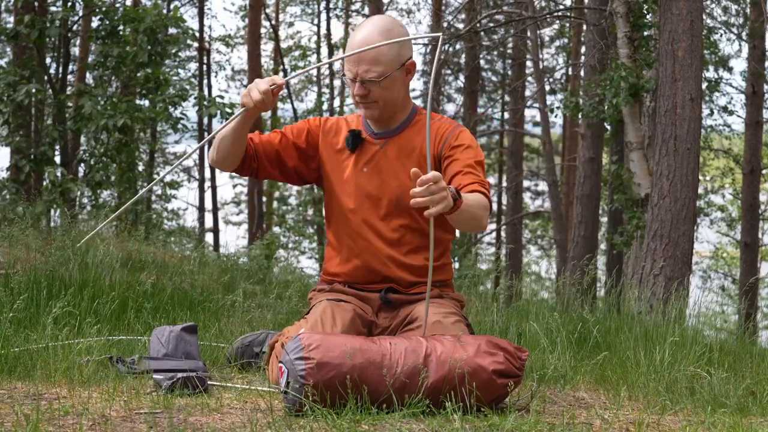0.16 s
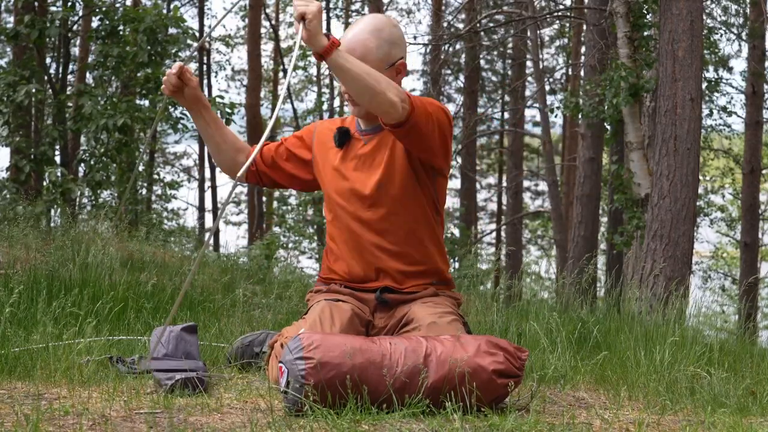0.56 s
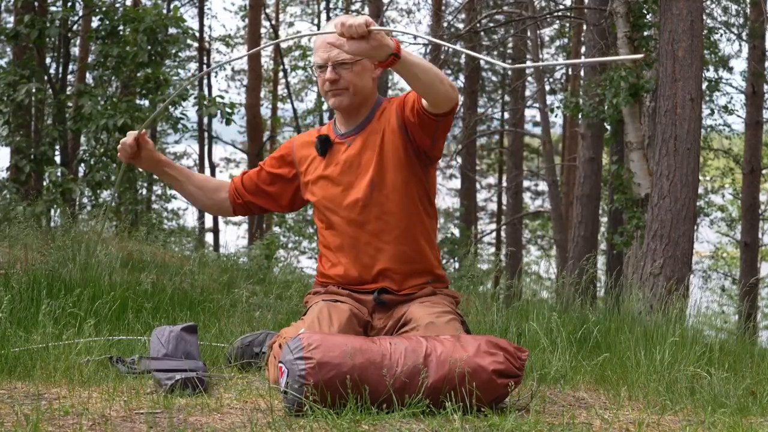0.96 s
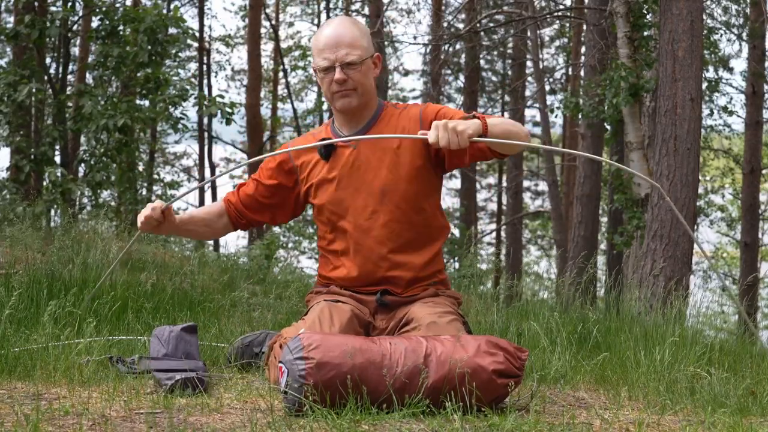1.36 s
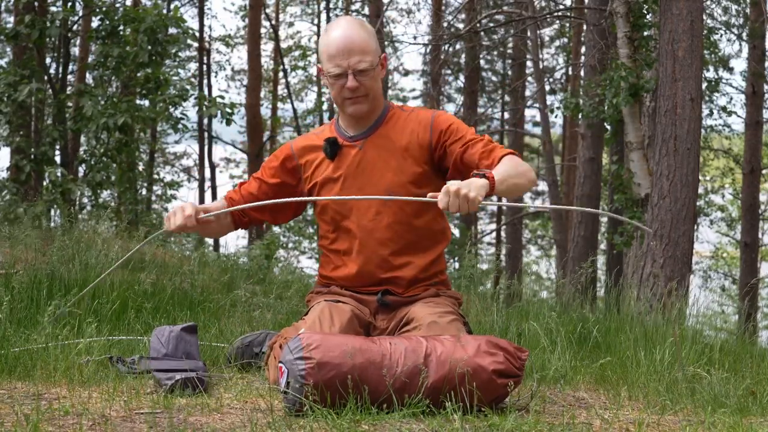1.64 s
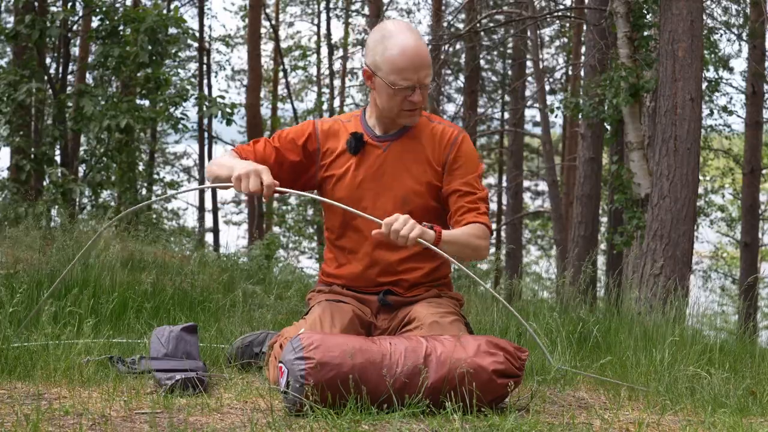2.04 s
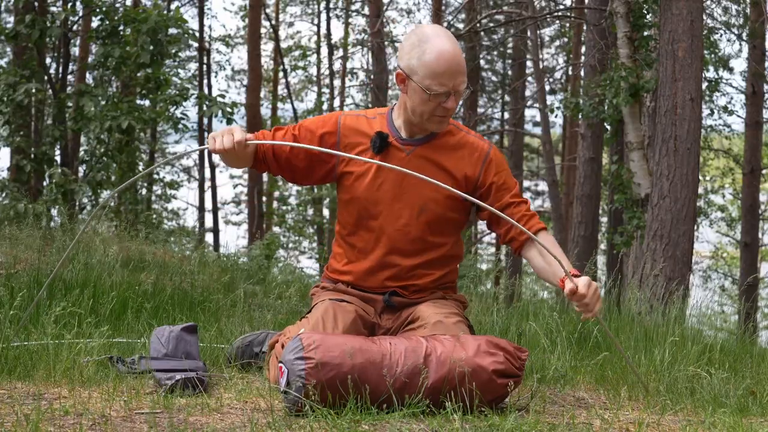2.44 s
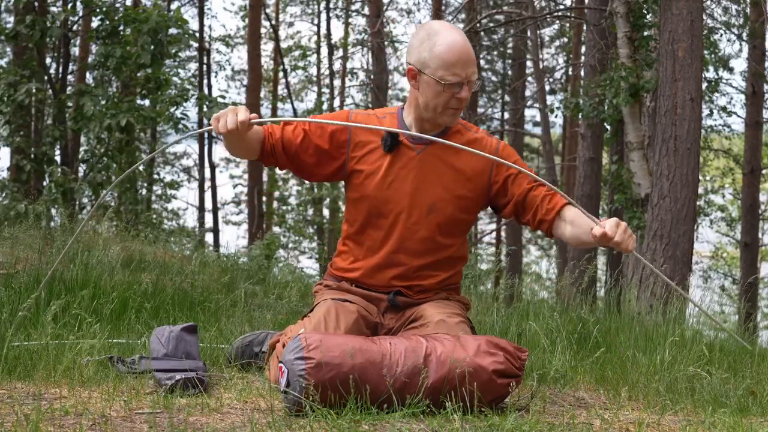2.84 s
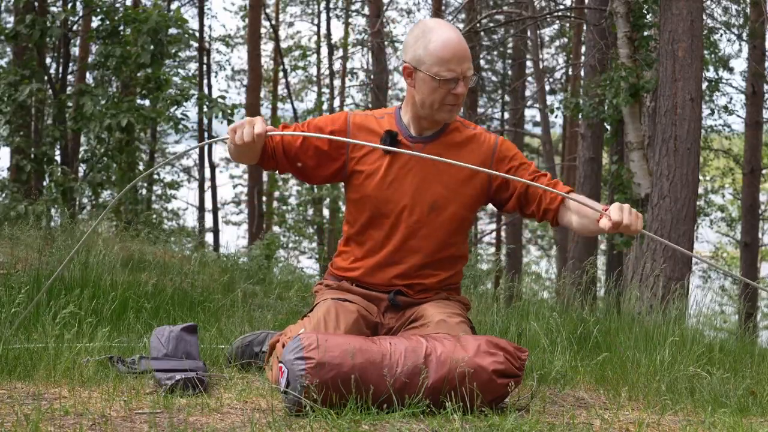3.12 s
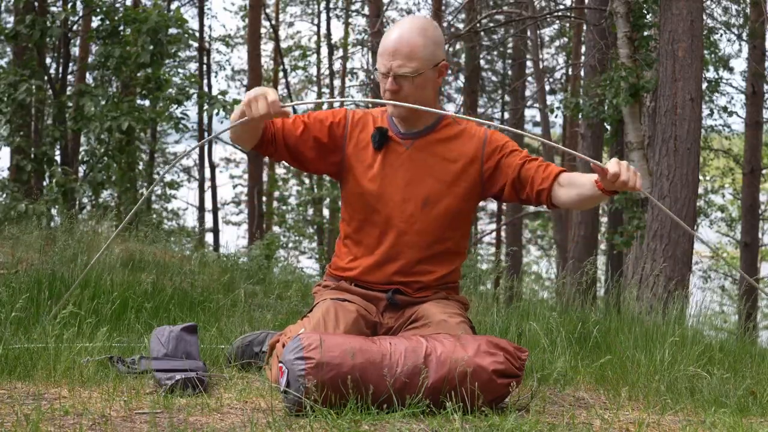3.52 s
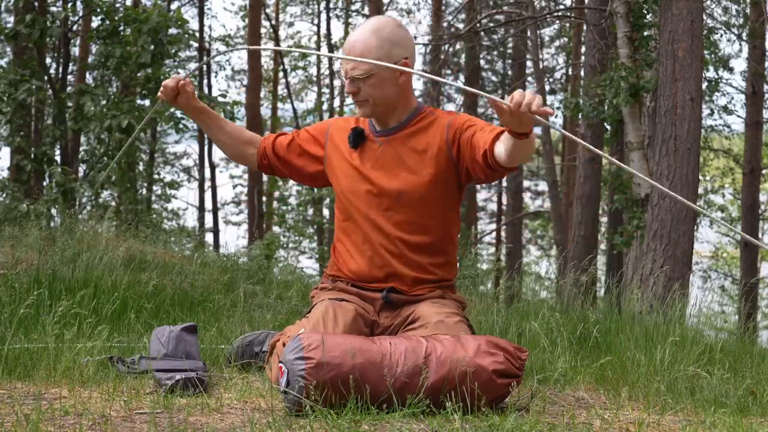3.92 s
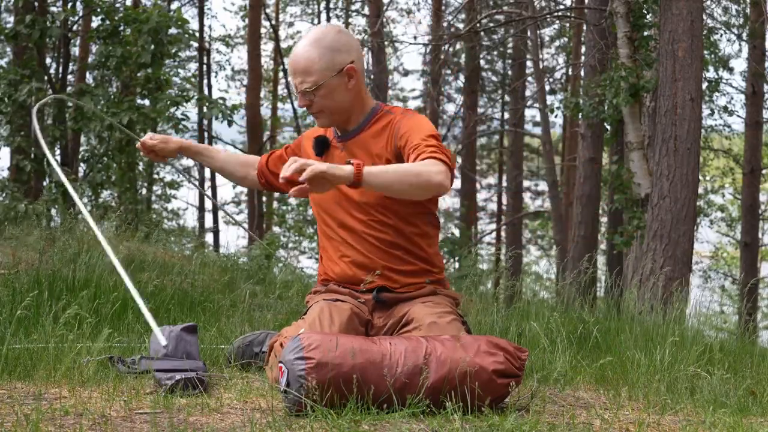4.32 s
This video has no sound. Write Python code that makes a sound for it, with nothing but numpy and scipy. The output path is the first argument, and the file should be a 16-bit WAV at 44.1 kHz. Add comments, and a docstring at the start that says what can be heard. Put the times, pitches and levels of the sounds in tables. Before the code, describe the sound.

Outdoors among pines, a tent pole is unfolded very close to a clip-on microphone. A quick rattle of thin tubes and cloth rustle comes first, then separate hard snaps with short scrapes. A finch trills and buzzes at a distance in the first half, with a light forest echo. Later come soft sliding, a strained creak, a strong double snap, and quiet rustling over a soft breeze.

```python
"""Cloth rustles close to a clip-on microphone over a soft breeze, then tubes scrape, rattle and snap:
a shock-corded tent pole is unfolded in a pine wood. Contacts are noise bursts rung through tube resonances;
hands, sleeves and breeze are coloured noise; squeaks and the cord's zip are tones of uneven pitch.
A finch, built from bending and buzzing whistles, sings one phrase farther off, with a scattered echo."""
import sys
import numpy as np
from scipy import signal
from scipy.fft import rfft, irfft, next_fast_len
from scipy.io import wavfile
from scipy.ndimage import uniform_filter1d, map_coordinates

SR = 44100
rng = np.random.default_rng(int(sys.argv[2]) if len(sys.argv) > 2 else 0)


def pcm_store(signal):
    """Save signal as 16-bit PCM."""
    levels = np.round(np.clip(np.atleast_2d(signal), -1, 1) * 32767)
    wavfile.write(sys.argv[1], SR, levels.astype(np.int16).T)


N = 197612

# contacts of the tubes: [t/s, t60/s, level/dB, low knock/dB, brightness/dB, ring f/Hz, knock f/Hz];
# knock and brightness are relative to the level
TUBE_CONTACTS = [(0.1051, 0.016, -13, 15, -21, 7000, 696), (0.1117, 0.035, -13.5, 3.5, -2, 6350, 750),
                 (0.122, 0.0085, -26, 17, -20, 4400, 1300), (.1375, 0.01, -28, 14, -25, 3300, 700),
                 (.1475, 0.021, -10, 3.5, -11, 5500, 600), (0.1611, 0.0089, -18, 2, -20, 3980, 1200),
                 (.17, 0.017, -17, 4, 3, 4570, 600), (.257, 0.035, -18.5, 1, -2, 6400, 1400),
                 (0.4098, 0.0062, -22, 8, -40, 4960, 1200), (.414, 0.015, -15.5, 12.5, -54, 4800, 420),
                 (.577, .018, -16, 4, -37, 3770, 1500), (0.7089, 0.0055, -1.5, -6.5, 1, 5500, 805),
                 (0.7106, 0.014, 5, -5.5, 2.5, 5600, 1280), (0.8285, 0.012, -25.5, 18.5, -19, 4020, 1260),
                 (0.8426, 0.013, -22.5, 3, -20, 5640, 1000), (.89, .013, -27, -1, -19, 6800, 1000),
                 (1.0893, 0.017, -1, -2, -28, 6700, 1200), (1.0918, 0.03, -3.5, -5.5, -12, 2950, 1200),
                 (1.2988, 0.007, -23, 0, -31, 3470, 1000), (1.4559, 0.015, 8, 0, -5, 4360, 500),
                 (1.487, 0.019, -13, -19, -12, 2980, 1000), (1.526, 0.0078, -18, -13, -19, 4200, 1000),
                 (1.8033, 0.017, -12.5, -1.5, -44, 3200, 1600), (1.8295, 0.021, -2, -11, -5.5, 4030, 1600),
                 (1.859, 0.028, -9, -23, -16, 3200, 1980), (1.97, 0.011, -12.5, -19, -31, 3580, 2110),
                 (2.049, 0.0077, -23.5, -10, -42, 2560, 2300), (2.511, .018, -22, 1, -21, 7010, 980),
                 (2.525, 0.015, -23.5, 4, -11, 5170, 1000), (2.843, 0.044, -20, -19, 1.5, 3400, 2000),
                 (2.8886, 0.011, -23, -3, -15, 3070, 2000), (2.9796, 0.017, -5, -27, -21.5, 6200, 2000),
                 (2.9814, 0.011, -8.5, -1, -5, 6600, 2300), (3.0455, 0.016, 7.5, 0.5, -0.5, 5440, 1040),
                 (3.0552, 0.014, -3.5, -7, -11, 2720, 2440), (3.1492, 0.038, -14.5, -4, -36, 5460, 2300),
                 (3.8254, 0.015, -14.5, -7, -2, 5400, 1600), (3.8371, .02, -7, 0.5, 0, 3780, 1640)]
# resonances of the tubes: [f/Hz, width/Hz, level/dB]
TUBE_MODES = [(620, 180, -11.5), (1150, 540, -6), (2260, 460, -7), (3020, 670, -4), (4620, 700, -4),
              (5480, 540, -6), (6230, 390, -7), (7000, 740, -12), (9200, 1400, -18), (11070, 550, -19),
              (13800, 700, -33)]


def amp(db):
    """Decibels to gain."""
    return 10 ** (np.asarray(db) / 20)


def unit(x):
    """Scaled to rms 1."""
    return x / np.sqrt(np.mean(x ** 2) + 1e-20)


def along(points, hz):
    """(Hz, value) points read on a log frequency axis."""
    f, v = np.transpose(points)
    return np.interp(np.log(hz + 1), np.log(f), v)


def level(rows):
    """(s, dB) rows as a gain per sample."""
    return amp(np.interp(np.arange(N) / SR, *np.transpose(rows)))


def wobble(rate, size=N):
    """A smooth random curve, rate knots a second."""
    knots = rng.standard_normal(int(size * rate / SR) + 4)
    return map_coordinates(knots, [np.arange(size) * rate / SR])


def filtered(x, response):
    """x times a response of frequency."""
    m = next_fast_len(N + SR // 2)
    return irfft(rfft(x, m) * response(np.fft.rfftfreq(m, 1 / SR)), m)[..., :N]


def resonances(modes, f):
    """Complex response of (Hz, width, dB) modes, alternating in sign."""
    return sum((-1) ** k * amp(db) * 1j * f * width / (hz * hz - f * f + 1j * f * width)
               for k, (hz, width, db) in enumerate(modes))


def causal(gain):
    """The response with this gain that rings only after the blow (minimum phase)."""
    cepstrum = irfft(np.log(np.maximum(gain, 1e-6)))
    half = len(cepstrum) // 2
    return np.exp(rfft(np.r_[cepstrum[0], 2 * cepstrum[1:half], np.zeros(half)]))


def add(track, s, sound):
    """Mix a sound into the track at time s."""
    part = track[max(0, round(s * SR)):][:len(sound)]
    part += sound[:len(part)]


def grit(spread_db, rate):
    """Friction noise: tiny catches of uneven but bounded size."""
    return rng.standard_normal(N) * amp(spread_db * np.tanh(wobble(rate)))


def breeze():
    """A soft rush in the crowns with a gently heaving rumble below, both coloured noise."""
    # strength of the rush before its lift: [t/s, level/dB]
    rush_level = [(0.0, -59.5), (0.41, -58.5), (0.79, -63), (2.48, -64), (2.78, -64.5), (4.17, -59.5),
                  (4.48, -60.5)]
    # colour of the rush: [f/Hz, level/dB]
    rush_colour = [(12, -33), (20, 0.5), (216, -2), (590, -8.5), (873, -4), (1260, -7.5), (2020, -21),
                   (2200, -17.5), (4180, -49), (5530, -27), (6360, -25), (7310, -37), (11100, -32.5),
                   (14700, -29), (16000, -38)]
    rumble_colour = [(15, -21), (45, 24.0), (70, 24.0), (150, -49), (600, -73)]  # [f/Hz, level/dB]
    rush_lift_db, rumble_db = 2.5, -72
    rush = unit(filtered(rng.standard_normal(N), lambda f: amp(along(rush_colour, f))))
    heaving = grit(spread_db=-16, rate=7.8)
    rumble = unit(filtered(heaving, lambda f: amp(along(rumble_colour, f))))
    return amp(rush_lift_db) * level(rush_level) * rush + amp(rumble_db) * rumble


def crinkle(rate, life):
    """Sparse little snaps of folding fabric, rate a second, each dying in life seconds."""
    snaps = (rng.random(N) < rate / SR) * rng.uniform(0.13, 1, N)
    envelope = signal.lfilter([1], [1, -np.exp(-1 / (life * SR))], snaps)
    return unit(envelope * rng.standard_normal(N))


def stroke(s, rise, fall, db):
    """Gain of a movement that speeds up until time s and slows down again."""
    t = np.arange(N) / SR - s
    return amp(db) * np.exp(-(t / np.where(t < 0, rise, fall)) ** 2)


def together(gains):
    """Joint gain of overlapping frictions: their powers add."""
    return np.sqrt(sum(g ** 2 for g in gains))


def rubs():
    """Gain of the rubbing that dies away after each contact of the tubes."""
    rub_db, rub_t60_s = -65.5, 0.5  # start level relative to the contact; decay
    t = np.arange(N) / SR
    return together((t > s) * amp(db + rub_db - 60 * np.abs(t - s) / rub_t60_s)
                    for s, _, db, *_ in TUBE_CONTACTS)


def handling():
    """Cloth, tube and palm friction, each in its own colour; one set of movements drives shirt, sleeves and tubes."""
    # movements and short slides before a snap: [t/s at the fastest, rise/s, fall/s, shirt rustle level/dB,
    # sleeve swish level/dB, tube scrape level/dB]
    movements = [(0, .02, 0.069, -53, -64.5, -78), (.135, 0.025, 0.071, -46.5, -59, -70),
                 (.33, 0.098, 0.11, -52, -65.5, -59), (.53, 0.066, 0.069, -55, -74, -54),
                 (0.707, 0.0083, 0.0047, -65, -81, -53), (.76, 0.027, 0.016, -80, -62, -57.5),
                 (.87, 0.075, 0.059, -77, -65.5, -66), (1.455, 0.042, 0.027, -57.5, -62, -54.5),
                 (1.52, 0.027, 0.049, -55, -71, -58), (1.815, 0.014, .07, -56.5, -76, -53),
                 (1.945, 0.039, 0.049, -59, -76, -61.5), (2.37, 0.38, 0.086, -64, -74.5, -76),
                 (2.63, 0.18, 0.21, -64.5, -88, -65), (2.85, 0.042, 0.1, -63, -72, -70),
                 (2.978, 0.0087, .008, -60, -74, -48.5), (3.03, 0.036, 0.039, -63, -77, -54),
                 (3.5, .14, 0.065, -62, -69.5, -80), (4.05, 0.1, 0.14, -62.5, -62.5, -83)]
    # palm gliding along the smooth tube: [t/s at the fastest, rise/s, fall/s, level/dB]
    palm_glides = [(1.77, .1, 0.12, -64), (2.18, 0.11, 0.24, -65.5), (3.68, 0.15, 0.1, -64)]
    # a strained joint sings as it slides: [t/s at the fastest, rise/s, fall/s, level/dB]
    joint_strains = [(2.68, 0.099, 0.075, -73), (2.8, .05, 0.045, -57.5)]
    # resonances of a joint under tension: [f/Hz, width/Hz, level/dB]
    joint_modes = [(3400, 67, 14), (4900, 90, 0), (5700, 130, 2), (6340, 150, -2), (7000, 220, -21),
                   (8770, 200, -1)]
    # colour of the shirt cloth: [f/Hz, level/dB]
    cloth_colour = [(60, -11), (250, 6), (900, 0.5), (1800, -0.5), (3500, -3), (6000, -14), (10000, -25.5),
                    (16000, -36)]
    # colour of the sleeve: [f/Hz, level/dB]
    sleeve_colour = [(1500, -36), (4000, -16.5), (5400, 1), (6600, -2), (8500, -5.5), (10500, -13),
                     (16000, -31)]
    # colour of the palm: [f/Hz, level/dB]
    palm_colour = [(1000, -25), (4000, -9), (7000, -10.5), (10000, -5.5), (13000, -5.5), (16000, -15)]
    shirt_rest_db, sleeve_rest_db, scrape_rest_db = -67.5, -78, -73.5  # between movements

    folds = .55 * crinkle(rate=110, life=.0008)
    cloth = unit(filtered(grit(spread_db=4.5, rate=200) + folds, lambda f: amp(along(cloth_colour, f))))
    sleeve = unit(filtered(grit(spread_db=3.5, rate=85) + folds, lambda f: amp(along(sleeve_colour, f))))
    catches = grit(spread_db=4, rate=500)
    scrape = unit(filtered(catches, lambda f: (np.abs(resonances(TUBE_MODES, f)) + 0.054) * f / (f + 2500)))
    palm = unit(filtered(grit(spread_db=1.7, rate=150), lambda f: amp(along(palm_colour, f))))
    joint = unit(filtered(grit(spread_db=0.5, rate=130), lambda f: resonances(joint_modes, f)))

    # one row of gain each for shirt, sleeve and tube
    rustle, swish, slide = together(stroke(s, rise, fall, np.reshape(dbs, (3, 1)))
                                    for s, rise, fall, *dbs in movements)
    return (cloth * together([rustle, amp(shirt_rest_db)])
            + sleeve * together([swish, amp(sleeve_rest_db)])
            + scrape * together([slide, rubs(), amp(scrape_rest_db)])
            + palm * together(stroke(*row) for row in palm_glides)
            + joint * together(stroke(*row) for row in joint_strains))


def chatter(t60, crack, rise=0.00047, size=4096, count=90):
    """Spectrum of a hard touch, then ever smaller and duller micro-bounces, of even energy in all bands."""
    bounce_dull_hz = 9000  # the late bounces lose their treble above this
    touch_s = 0.0034  # time constant of the hard, bright part
    t = np.arange(size) / SR
    envelope = (amp(-60 * t / t60) + crack * np.exp(-t / 0.00045)) * (1 - np.exp(-t / rise))
    hard = rng.standard_normal(size)
    soft = signal.lfilter(*signal.butter(1, min(bounce_dull_hz, SR / 3), fs=SR), hard)
    burst = rfft((soft + (hard - soft) * np.exp(-t / touch_s)) * envelope)
    band_power = uniform_filter1d(np.abs(burst) ** 2, count)
    return burst / causal(np.sqrt(np.abs(band_power)))


def contact(t60, knock_db, bright_db, ring_hz, knock_hz):
    """A contact chatters into the tube's resonances, with its own strongest ring and its own low knock."""
    # colour of the low knock, before each contact's own knock level: [f/Hz, level/dB]
    knock_colour = [(100, -19.5), (300, -1), (480, 4), (780, -0.5), (1200, -1.5)]
    body_db, sparkle_db = -1, 3  # at 2.4 kHz; at 9.5 kHz before its share of the brightness
    burst = chatter(t60, crack=1.17)
    f = np.linspace(0, SR / 2, len(burst))
    tone = amp(along([*np.add(knock_colour, [0, knock_db]), (2400, body_db), (5000, 0),
                      (9500, sparkle_db + .22 * bright_db), (13000, bright_db), (16000, bright_db - 10.0)], f))
    tube = np.abs(resonances(TUBE_MODES, f)) + 0.22
    tube /= uniform_filter1d(tube, size=400)  # keep the peaks, level the overall slope
    ring = 0.49 + 1.46 * np.abs(resonances([(ring_hz, 380, 0)], f))
    # the bending mode that a knock excites most
    bend = 1 + 1.01 * np.abs(resonances([(knock_hz, 247, 0)], f))
    return irfft(burst * causal(tone * tube * ring * bend))


def ticks():
    """Faint ticks of loose joints at random times, each at its own pitch."""
    ticks_per_s, t60_s, tick_db, spread_db = 9, 0.033, -36.5, 6.5
    out = np.zeros(N)
    for when, size, pitch in rng.random((int(ticks_per_s * N / SR), 3)):
        tick = contact(t60_s, knock_db=10.5, bright_db=-12,
                       ring_hz=3300 + 4200 * pitch, knock_hz=400 + 900 * pitch)
        add(out, when * N / SR, amp(tick_db + spread_db * (2 * size - 1)) * tick)
    return out


def clicks():
    """The sections knock together and snap into their sockets, one resonant burst per contact."""
    out = np.zeros(N)
    for s, t60, db, knock_db, bright_db, ring_hz, knock_hz in TUBE_CONTACTS:
        add(out, s, amp(db) * contact(t60, knock_db, bright_db, ring_hz, knock_hz))
    return out


def squeaks():
    """Stick-slip whistles of a sliding section: a rough gliding tone with a faint octave."""
    # slides: [t/s, length/s, start f/Hz, end f/Hz, level/dB, pitch roughness as a share]
    slides = [(0.106, 0.0235, 6860, 5770, -39, 0.066), (0.364, 0.053, 3930, 5100, -47, 0.033),
              (0.393, 0.019, 4500, 5090, -30, .014), (1.356, 0.094, 6950, 7100, -64.5, .02),
              (1.933, 0.015, 6640, 6600, -49.5, 0.032), (3.627, 0.0078, 5960, 6130, -56, .014),
              (4.462, 0.0053, 7000, 7200, -55.5, .014)]
    octave_db = -27.5
    out = np.zeros(N)
    for s, length, start_hz, end_hz, db, rough in slides:
        u = np.linspace(0, 1, int(length * SR))
        hz = (start_hz + (end_hz - start_hz) * u) * (1 + rough * wobble(1700, size=len(u)))
        phase = 2 * np.pi * np.cumsum(hz) / SR
        tone = np.sin(phase) + amp(octave_db) * np.sin(2 * phase)
        add(out, s, amp(db) * np.sin(np.pi * u) * tone)
    return out


def forest(x, build=0.011):
    """Single trunks and a wash of leaves scatter sound into a thin echo that builds up and lingers."""
    # decay of the echo: [f/Hz, t60/s]
    echo_decay = [(500, 0.16), (3500, 0.42), (10000, 0.17)]
    trunks_per_s, leaf_scatter = 260, 0.014  # distinct reflections; the diffuse wash between them
    strength = (rng.random(SR) < trunks_per_s / SR) + leaf_scatter
    scatter = rng.standard_normal(SR) * strength
    hz, t, z = signal.stft(scatter, SR, nperseg=256)
    decay = amp(-60 * t / along(echo_decay, hz)[:, None])
    tail = signal.istft(z * decay * (1 - np.exp(-t / build)), SR, nperseg=256)[1]
    return signal.fftconvolve(x, tail / np.linalg.norm(tail))[:N]


def bumps():
    """The shirt nudges the microphone: short, dull swells of unsteady low tone."""
    # nudges: [t/s, length/s, f/Hz, level/dB before the lift below]
    nudges = [(0.377, .044, 45, -57), (0.402, 0.022, 305, -49), (0.609, 0.0092, 430, -51.5),
              (1.498, 0.024, 229, -61), (1.786, 0.055, 205, -54.5), (2.984, 0.072, 42.6, -56),
              (3.108, 0.065, 62, -53.5), (3.157, 0.059, 56, -52), (3.528, 0.016, 394, -54),
              (3.573, 0.12, 31.8, -61.5), (3.915, 0.16, 47.7, -60)]
    lift_db = 6.5
    out = np.zeros(N)
    for s, length, hz, db in nudges:
        window = np.hanning(int(length * SR))
        phase = 2 * np.pi * np.cumsum(hz * (1 + 0.3 * wobble(hz, size=len(window)))) / SR
        add(out, s, amp(db + lift_db) * window * np.sin(phase))
    return out


def cord():
    """The braided cord zips over a tube's rim, faster and faster, catching unevenly."""
    start_s, end_s, start_hz, end_hz = .48, .592, 990, 1930  # time and catch rate
    cord_db, snag_db = -51.5, 6  # level before the swell; depth of the snags
    t = np.arange(N) / SR
    speed = np.clip((t - start_s) / (end_s - start_s), 0, 1) ** 1.2
    unevenness = 1 + .045 * wobble(1300) + .03 * wobble(90)
    phase = 2 * np.pi * np.cumsum((start_hz + (end_hz - start_hz) * speed) * unevenness) / SR
    # short snags make the overtones as strong as the catch rate itself
    zip_tone = sum(np.sin(k * phase) * amp(4 * np.tanh(wobble(120))) for k in range(1, 4))
    snags = amp(snag_db * np.tanh(wobble(700)))
    swell = np.interp(t, [start_s, (start_s + end_s) / 2, end_s - .014, end_s], [0, 1, 1, 0])
    return amp(cord_db) * unit(zip_tone * snags) * swell


def whistle(hz, buzz_hz):
    """A pure tone on a pitch track; a fast, slightly uneven flutter of depth buzz_hz makes it buzz."""
    flutter = 0
    if buzz_hz:
        rate_hz = 190 * (1 + 0.145 * wobble(146.7, size=len(hz)))
        flutter = np.sin(2 * np.pi * np.cumsum(rate_hz) / SR)
    return np.sin(2 * np.pi * np.cumsum(hz + buzz_hz * flutter) / SR)


def note(length, bend_hz, db, buzz_hz=0, skew=1):
    """One note swells and fades, bending through start, middle and end pitch; skew under 1 peaks early."""
    u = np.linspace(0, 1, int(length * SR))
    hz = np.polyval(np.polyfit([0, .5, 1], bend_hz, 2), u)
    swell = np.abs(np.sin(np.pi * u ** skew)) ** 0.4
    return amp(db + 3.5) * swell * whistle(hz, buzz_hz)  # every note is lifted by 3.5 dB


def trill(count=6):
    """Evenly spaced syllables, a short rising hook and a steep fall, swelling, no two quite alike."""
    start_s, period_s = 1.1255, .0753
    full_db, soft_db, swell = -44, -6.5, 1.9  # before note's lift; first relative to full; syllables to swell
    fall_s, fall_hz = .021, (4900, 3490, 3210)
    hook_lead_s, hook_s, hook_hz, hook_db = .02, 0.0135, (4030, 4260, 4450), -8.5  # dB relative to the fall
    vary, vary_db = .015, 1  # greatest random change of pitch (share) and level
    out = np.zeros(N)
    for k, (pitch, size) in enumerate(2 * rng.random((count, 2)) - 1):
        s = start_s + k * period_s
        tune = 1 + vary * pitch
        db = full_db + soft_db * np.exp(-k / swell) + vary_db * size
        add(out, s - hook_lead_s, note(hook_s, np.multiply(hook_hz, tune), db + hook_db))
        add(out, s, note(fall_s, np.multiply(fall_hz, tune), db, skew=.55))
    return out


def warble(count=7):
    """A quick run of arching notes, each a little higher."""
    start_s, period_s = 1.768, .0207
    arch_s, arch_hz, step_hz, arch_db = .016, (2620, 3170, 2660), 45, -47.5  # dB before note's lift
    out = np.zeros(N)
    for k in range(count):
        add(out, start_s + k * period_s, note(arch_s, np.add(arch_hz, k * step_hz), arch_db))
    return out


def finch():
    """One phrase of bending whistles: opening notes, trill, linking notes, warble and a falling buzz."""
    # single notes around the trill and warble: [t/s, length/s, start f/Hz, middle f/Hz, end f/Hz,
    # level/dB before note's lift, buzz depth/Hz]
    single_notes = [(0.869, 0.039, 5360, 4680, 3700, -59, 0), (1.013, 0.025, 5180, 4140, 4680, -52.5, 0),
                    (1.563, .037, 2630, 2960, 3310, -47.5, 3), (1.591, 0.019, 3140, 4320, 5460, -54.5, 0),
                    (1.631, 0.012, 4670, 4280, 4040, -47.5, 258),
                    (1.647, 0.0208, 3170, 3760, 3990, -44.5, 90),
                    (1.663, 0.025, 3760, 3240, 2530, -47, 272),
                    (1.898, 0.024, 3650, 3850, 4000, -51.5, 203)]
    # the buzzing flourish that closes the phrase: [t/s, f/Hz, rms level/dB]
    flourish = [(1.995, 5700, -62.5), (2.025, 4930, -62), (2.037, 4000, -56), (2.062, 3743, -50.5),
                (2.092, 4080, -57.5), (2.122, 3820, -52.5), (2.145, 2855, -55), (2.18, 2505, -66),
                (2.32, 2080, -72)]
    out = trill() + warble()
    for s, length, *bend_hz, db, buzz_hz in single_notes:
        add(out, s, note(length, bend_hz, db, buzz_hz))
    times, hz, db = np.transpose(flourish)
    t = np.arange(times[0], times[-1], 1 / SR)
    buzz = whistle(np.interp(t, times, hz), buzz_hz=290)
    add(out, times[0], np.sqrt(2) * amp(np.interp(t, times, db)) * buzz)
    return out


def scene():
    """The pole is within arm's reach and nearly dry; the bird is far and echoes. One microphone feeds both channels."""
    bird_echo_db, pole_echo_db = -9.5, -36  # forest echo relative to the direct sound
    pole = clicks() + ticks() + squeaks() + cord()
    bird = finch()
    near = pole + amp(pole_echo_db) * forest(pole) + handling() + bumps()
    far = bird + amp(bird_echo_db) * forest(bird)
    mono = near + far + breeze()
    return np.array([mono, mono])


def record(dry):
    """The recorder keeps nothing above its band limit, a short slope centred on top_hz."""
    top_hz, edge_hz = 16300, 500  # centre and width of the slope
    return filtered(dry, lambda hz: np.clip((top_hz - hz) / edge_hz + .5, 0, 1))


dry = scene()
out = record(dry)
pcm_store(out)
```